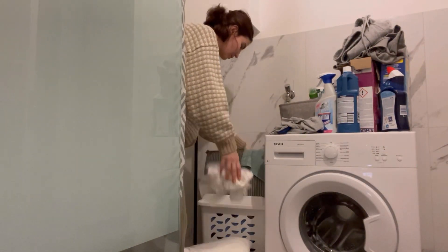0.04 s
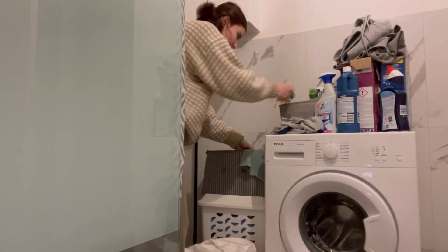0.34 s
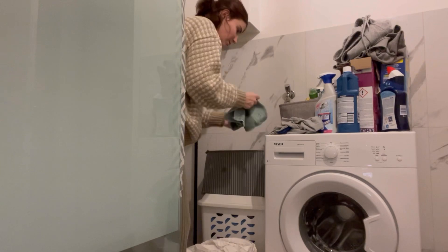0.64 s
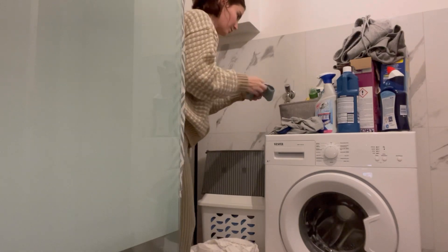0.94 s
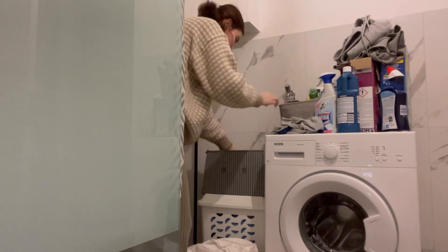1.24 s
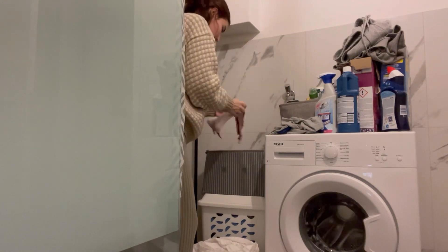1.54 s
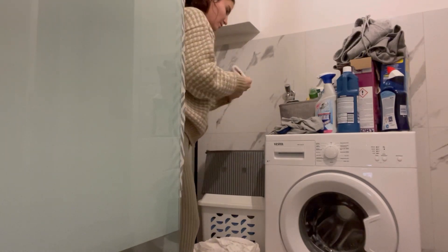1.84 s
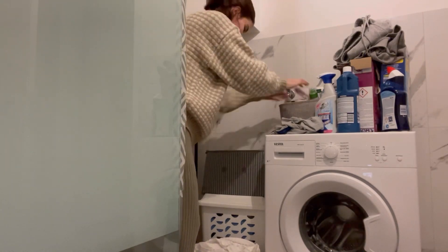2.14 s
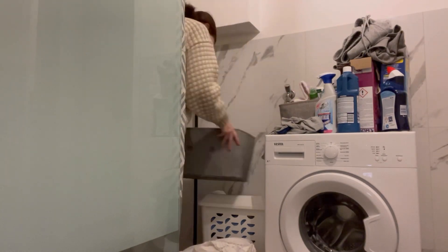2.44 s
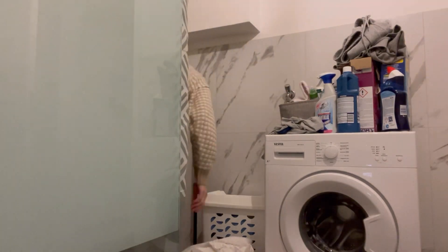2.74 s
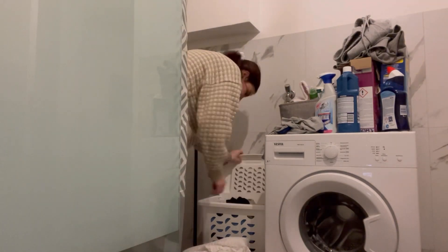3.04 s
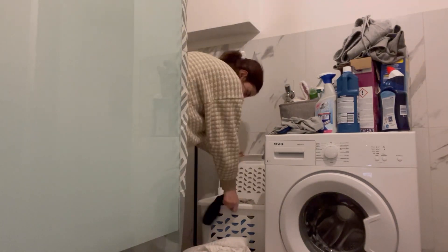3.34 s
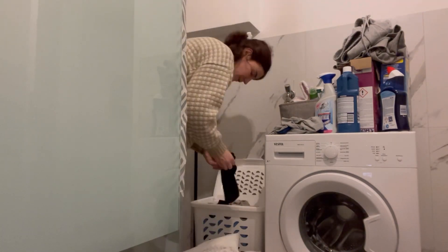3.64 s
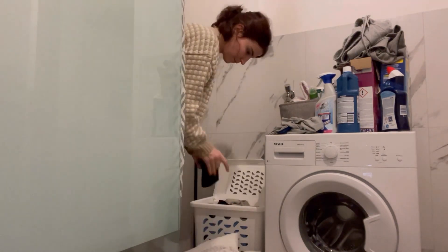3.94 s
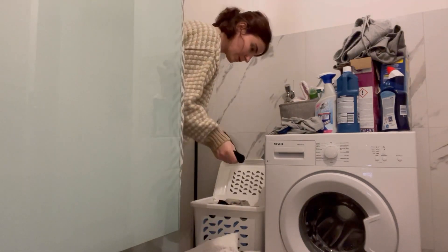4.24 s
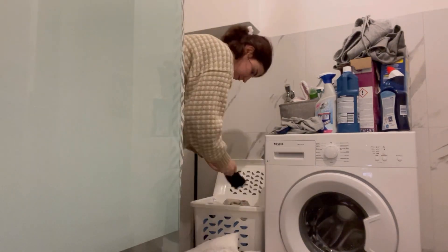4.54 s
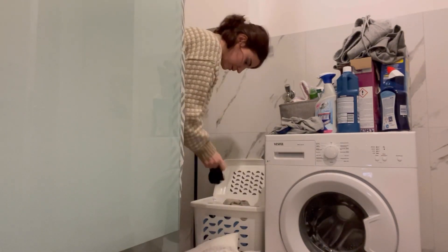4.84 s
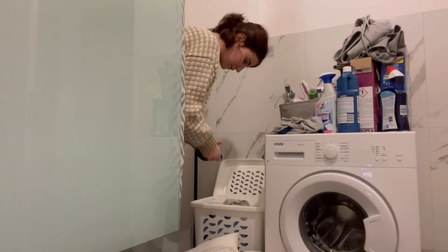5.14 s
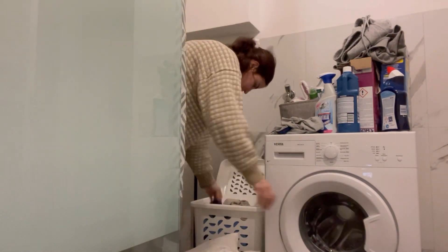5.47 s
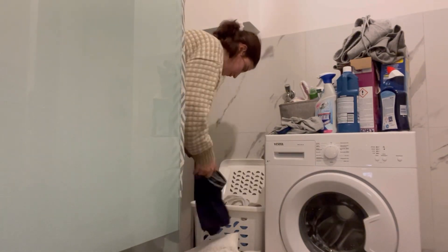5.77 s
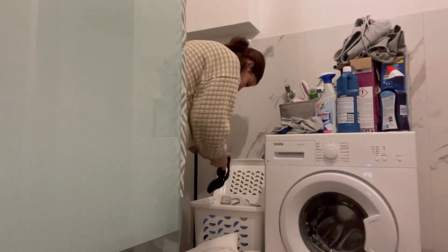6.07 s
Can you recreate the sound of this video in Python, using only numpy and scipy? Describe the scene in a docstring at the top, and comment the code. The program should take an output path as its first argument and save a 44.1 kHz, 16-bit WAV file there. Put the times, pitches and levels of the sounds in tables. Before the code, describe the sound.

Cloth rustles quietly in a tiled bathroom while small things are put down with light clinks. A hollow plastic basket is bumped and dragged, gives one sharp knock, and its lid snaps open with a bright crack and a few smaller clicks. Then socks are shaken in soft, dull flaps, followed by more rustling and faint bumps. Ventilation rushes low throughout, and a phone picks it all up from a couple of metres away.

```python
"""Sorting laundry in a tiled bathroom

The ventilation rushes quietly, and cloth rustles as its fibres catch and let go. Shaken socks
push puffs of air into the room. Small things are put down with a clink. A hollow plastic basket
is dragged and knocked, and its lid snaps open with a bright crack. The sounds bounce off the
tiles and reach a phone a couple of metres away."""
import sys
import numpy as np
from scipy import signal
from scipy.fft import rfft, irfft, next_fast_len
from scipy.io import wavfile
from scipy.ndimage import uniform_filter1d

SR = 44100
rng = np.random.default_rng(int(sys.argv[2]) if len(sys.argv) > 2 else 0)


def store_wav(level_fs):
    """Save 16-bit WAV to argv[1]."""
    pcm = np.round(np.clip(np.atleast_2d(level_fs), -1, 1) * 32767)
    wavfile.write(sys.argv[1], SR, pcm.T.astype(np.int16))


N = 273861
TIME = np.arange(N) / SR
RING_TIME = TIME[:SR // 2]  # half a second for one sound to ring out


def amp(db):
    """Turn decibels into a gain."""
    return 10 ** (np.asarray(db) / 20)


def unit(x):
    """Scale a sound to an average (rms) level of 1."""
    return x / np.sqrt(np.mean(x ** 2))


def short_rms(x):
    """Level of the loudest 25 ms."""
    return np.sqrt(uniform_filter1d(np.mean(x ** 2, axis=0), 1100).max())


def colour(x, points):
    """Shape the tone along (pitch_hz, gain_db) points."""
    n = 2 * next_fast_len(x.shape[-1] // 2 + SR // 20)
    hz, db = np.transpose(points)
    bin_hz = np.arange(n // 2 + 1) * SR / n
    gain = amp(np.interp(np.log(bin_hz + 1), np.log(hz), db))
    cepstrum = irfft(np.log(gain))
    cepstrum[1:n // 2] *= 2  # folded forward in time, so nothing rings before its cause
    cepstrum[n // 2 + 1:] = 0
    return irfft(rfft(x, n) * np.exp(rfft(cepstrum)))[..., :x.shape[-1]]


def butter(x, hz, kind, order=2):
    """Keep the lows, the highs or a band between."""
    return signal.sosfilt(signal.butter(order, hz, kind, fs=SR, output="sos"), x)


def fade(ring_s):
    """Die away by 60 dB in ring_s seconds."""
    return amp(-60 * RING_TIME / ring_s)


def swell(t, swell_s, fade_s):
    """One movement of the hand: it gathers until t = 0, then dies away."""
    return np.exp(-(t / np.where(t < 0, swell_s, fade_s)) ** 2)


def wander(per_s):
    """A smooth random drift, roughly between -1 and 1."""
    hold = int(SR / per_s)
    steps = np.repeat(rng.standard_normal(N // hold + 1), hold)
    return uniform_filter1d(steps, hold)[:N]


def clicks(per_s, scatter_db):
    """Tiny random clicks, most weak and a few strong."""
    signed = (rng.random((1, N)) < per_s / SR) * rng.choice([-1, 1], N)
    return signed * amp(scatter_db * np.minimum(rng.exponential(size=N), 4))


def add(out, start_s, sound):
    """Mix a sound in at start_s."""
    start = int(start_s * SR)
    sound = sound[:, max(-start, 0):out.shape[1] - start]
    out[:, max(start, 0):max(start, 0) + sound.shape[1]] += sound


# How wide the sound is between the two microphones: pitch_hz, side_minus_mid_db
STEREO_WIDTH = [(150, -32.5), (350, -11.5), (700, -2), (1400, -5), (2800, -1), (6000, 1.5)]
def diffuse(n):
    """Noise from all sides: alike left and right in the bass, unrelated in the treble."""
    mid, side = rng.standard_normal((2, n))
    side = colour(side, STEREO_WIDTH)
    return unit(np.array([mid + side, mid - side]))


def tiles(low_ring_s, high_ring_s, direct):
    """A direct click in both channels, then dense echoes; lows and treble each fade at their own rate."""
    noise = diffuse(len(RING_TIME))
    low = butter(noise, 1860, "low")
    out = low * fade(low_ring_s) + (noise - low) * fade(high_ring_s)
    out[:, 0] += direct
    return out


def ring(tones, build_s, lag_s, lead_s=0.00003, vary_db=4, build_cycles=0.38):
    """Tones build up between the walls, low ones last, and fade; each comes from its own direction."""
    out = 0
    for k, (hz, db, ring_s) in enumerate(tones):
        lag = (lead_s + lag_s * (2 * rng.random() - 1)) * np.array([[1], [-1]])
        size = amp(db + vary_db * rng.standard_normal())  # no two blows land on the same spot
        build = 1 - np.exp(-RING_TIME / (build_s + build_cycles / hz))
        tone = np.sin(2 * np.pi * hz * (RING_TIME + lag))
        out = out + (-1) ** k * size * build * fade(ring_s) * tone
    return unit(out)


def hollow(x, hz, width_hz, db):
    """The hollow nearest the contact swells after it and rings on."""
    return x + amp(db) * signal.lfilter(*signal.iirpeak(hz, hz / width_hz, fs=SR), x)


def tilt(hardness_db):
    """A harder contact lifts the top three of five pitch ranges by one, two and three steps."""
    return hardness_db * np.array([0, 0, 1, 2, 3])


# Borders of the five pitch ranges of a blow (thump, body, clack, edge, tick): pitch_hz
RANGE_EDGES = [150, 450, 1000, 2200, 6000, 15000]
def strike(body, range_db):
    """Where and how hard a blow lands decides how strongly each pitch range answers."""
    edges = np.transpose([RANGE_EDGES[:-1], RANGE_EDGES[1:]])
    centre_hz = np.sqrt(edges.prod(axis=1))
    for _ in range(2):
        levels = np.array([short_rms(butter(body, band, "band", order=4)) for band in edges])
        body = colour(body, np.transpose([centre_hz, range_db - 20 * np.log10(levels)]))
    return body


# Tone of the rushing air: pitch_hz, gain_db
AIR_COLOUR = [(18, -70), (30, -70), (70, -31), (115, -25), (165, -10), (215, -11.5), (280, -1), (449, -18),
              (721, -12.5), (822, -18.5), (1430, -20), (2010, -20.5), (2480, -16.5), (2900, -29.5),
              (3220, -18.5), (3870, -22.5), (12300, -40.5), (16000, -49)]
# Pitches at which the ventilation rings: pitch_hz, rough_width_hz, level_db
DUCT_TONES = [(184.4, 46, -71.5), (277.6, 24.7, -65.5), (346.6, 44, -72), (393, 23, -76.5),
              (716, 30, -74.5), (1458, 61, -74.5), (1738, 18, -80.5), (2431, 95, -71), (2537, 70, -72.5),
              (2754, 25, -74), (3170, 32, -75.5), (3110, 320, -75.5), (4935, 500, -77), (7010, 860, -77.5)]
def ventilation(rush_db=-64.5, waver_db=1.5):
    """A steady rush of air with narrow ringing bands, each wavering a little in level."""
    out = amp(rush_db) * unit(colour(diffuse(N), AIR_COLOUR))
    noise = diffuse(N)
    for hz, rough_width_hz, db in DUCT_TONES:
        b, a = signal.iirpeak(hz, hz / (1.16 * rough_width_hz), fs=SR)
        band = signal.lfilter(b, a, signal.lfilter(b, a, noise))
        out += amp(db) * unit(band * amp(waver_db * wander(per_s=6)))
    return out


# Tone of rubbing cloth: pitch_hz, gain_db
CLOTH_COLOUR = [(120, -6.5), (300, 12.5), (700, -8.5), (1500, -2.5), (3000, -1), (6000, -10.5),
                (10000, -11.5), (15000, -15)]
# Cloth pulled over cloth: peak_s, swell_s, fade_s, level_db
CLOTH_STROKES = [(.35, .02, .015, -72), (.436, 0.0094, 0.022, -62), (1.0, 0.048, .03, -80),
                 (1.21, 0.18, 0.036, -70.5), (1.334, 0.017, 0.023, -57.5), (1.7, 0.26, 0.35, -67.5),
                 (2.068, 0.016, 0.04, -65.5), (2.36, 0.069, 0.077, -61), (2.61, 0.017, 0.036, -57),
                 (2.685, 0.01, 0.066, -51), (2.895, 0.0073, 0.011, -57), (2.945, 0.014, 0.022, -73),
                 (3.73, 0.041, 0.12, -67.5), (4.0, .06, 0.054, -72.5), (4.065, 0.023, .025, -70),
                 (4.175, .025, .025, -66.5), (4.27, 0.05, 0.054, -67.5), (4.42, 0.0087, 0.016, -75),
                 (4.535, 0.018, 0.035, -63.5), (4.76, .04, 0.034, -81), (5.0, 0.15, 0.08, -69.5),
                 (5.3, 0.045, 0.049, -65.5), (5.318, 0.001, 0.011, -56), (5.54, 0.05, 0.027, -75),
                 (5.68, 0.033, 0.018, -66.5), (5.82, 0.074, 0.031, -72.5), (6.012, 0.0065, .025, -67)]
def rustle(fibres_per_s=800, creases_per_s=110, crease_db=-11, fidget_db=-77, sleeve_db=-12, folds=10):
    """Fibres catch and let go in dense tiny clicks; creases give way with crisper ones."""
    # The sleeves never rest, and they brush along with every scrape of the basket.
    sleeves = [(s, swell_s, fade_s, db + sleeve_db) for s, swell_s, fade_s, db, *_ in BASKET_SCRAPES]
    effort = amp(fidget_db)
    for peak_s, swell_s, fade_s, db in list(CLOTH_STROKES) + sleeves:
        effort = effort + amp(db) * swell(TIME - peak_s, swell_s, fade_s)
    fibres = creases = 0
    for _ in range(folds):  # each fold of cloth has its own echoes
        echoes = tiles(low_ring_s=0.2, high_ring_s=0.1, direct=5)
        catches = clicks(fibres_per_s / folds, scatter_db=1.5)
        fibres = fibres + signal.oaconvolve(catches, echoes, axes=1)[:, :N]
        buckles = clicks(creases_per_s / folds, scatter_db=4)
        creases = creases + signal.oaconvolve(buckles, echoes * fade(0.078), axes=1)[:, :N]
    crackle = unit(butter(colour(creases, CLOTH_COLOUR), 5440, "high"))
    cloth = unit(colour(fibres, CLOTH_COLOUR)) + amp(crease_db) * crackle
    flicker = amp(-0.8 * wander(per_s=41))
    return cloth * effort * flicker


# Low tones that ring between the tiled walls: pitch_hz, relative_db, ring_s
ROOM_TONES = [(190, -22, 0.12), (257.5, -0.5, 0.16), (282.8, -3.5, 0.16), (332.2, 0.5, 0.19),
              (386.6, -3, 0.089), (460, -4.5, 0.061), (572, -6.5, 0.059), (696, -16, 0.082)]
# Swings of a shaken sock: peak_s, length_s, relative_db, dull_above_hz
SOCK_SWINGS = [(3.661, 0.054, -51, 314), (3.767, 0.023, -50, 334), (3.821, 0.011, -42.5, 514),
               (3.9, 0.028, -46, 413), (3.988, 0.017, -46.5, 450), (4.053, 0.0051, -44.5, 520),
               (4.075, 0.019, -41, 305), (4.143, 0.0068, -40.5, 326), (4.229, 0.015, -37, 384),
               (4.316, 0.03, -45, 342), (4.38, 0.0019, -39.5, 395), (4.436, 0.043, -50, 281),
               (4.564, 0.016, -38, 300), (4.585, 0.0085, -45, 258), (4.663, 0.0064, -52.5, 296),
               (4.785, 0.018, -56.5, 290), (4.844, 0.012, -53, 298), (4.984, 0.021, -51, 315),
               (5.121, 0.021, -44.5, 288)]
def sock_flaps(push_db=-3, push_lead=0.357, walls_db=-9, gain_db=0.9):
    """Swinging cloth flutters, then goes taut with one push of air that wakes the room's low tones."""
    out = np.zeros((2, N))
    t = RING_TIME - RING_TIME.mean()
    for peak_s, length_s, db, dull_hz in SOCK_SWINGS:
        puff = rng.standard_normal(len(t)) * swell(t, length_s, length_s)
        puff /= np.linalg.norm(puff)
        puff[np.searchsorted(t, -push_lead * length_s)] += amp(push_db)  # just before the peak
        echoes = tiles(low_ring_s=0.43, high_ring_s=0.021, direct=7.5)
        walls = unit(colour(echoes, [(130, -3), (260, 8), (600, -1.5), (2000, -15)]))
        room = ring(ROOM_TONES, build_s=0.0012, lag_s=0.00008) + amp(walls_db) * walls
        sound = butter(signal.fftconvolve(puff[None], room), dull_hz, "low")
        sound = butter(sound, 205, "high", order=5)  # a small cloth cannot push deep bass
        add(out, peak_s + t[0], sound * amp(db) / short_rms(sound))
    return amp(gain_db) * out


# The close tones of one small hollow thing: pitch_ratio, relative_db
CLINK_TONES = [(.91, 8), (.955, 9), (1.001, 2.5), (1.081, 8.5), (1.13, -7)]
# Small hollow things being bumped: start_s, pitch_hz, level_db, ring_s
CLINK_HITS = [(1.051, 1318, -39.5, 0.14), (1.157, 2110, -50, 0.031), (1.162, 1406, -43.5, 0.046),
              (1.283, 2320, -48.5, 0.081), (2.49, 2168, -36.5, 0.055), (2.49, 4950, -49, 0.022),
              (2.728, 1255, -30, 0.033), (3.431, 4100, -47, 0.044), (3.432, 2894, -43.5, 0.096),
              (6.011, 1380, -60, 0.048)]
def clinks():
    """A small hollow thing rings with close tones that beat against each other and die quickly."""
    out = np.zeros((2, N))
    for start_s, hz, db, ring_s in CLINK_HITS:
        tones = [(ratio * hz, tone_db, ring_s) for ratio, tone_db in CLINK_TONES]
        sound = ring(tones, build_s=0.00066, lag_s=0.00008)
        add(out, start_s, sound * amp(db) / short_rms(sound))
    return out


# Tones of the basket and the air around it, scraped or knocked: pitch_hz, relative_db, ring_s
BASKET_TONES = [(184.5, -5.5, 0.177), (282.4, -1, 0.18), (342.9, 1, 0.25), (384, 2, 0.095),
                (481, -6.5, 0.2), (556, -1.5, 0.12), (577.8, 6, 0.12), (676, -2, 0.17), (807, 7.5, 0.12),
                (929, 0.5, 0.17), (997, -6.5, 0.19), (1173, -2, 0.14), (1298, 4, 0.11), (1450, -4.5, 0.12),
                (1650, -13, 0.082), (1800, -13, 0.046), (2017, -10.5, 0.14), (2390, -18, 0.3),
                (2410, -18, 0.11), (2980, -3, 0.079)]
# Tone of the crack when something touches the basket: pitch_hz, gain_db
CRACK_COLOUR = [(60, 0), (120, -7), (400, 6), (900, 3), (1500, 0.5), (3000, -7.5), (6000, -25),
                (15000, -39.5)]
# Plastic and sleeves dragged over plastic:
# peak_s, swell_s, fade_s, level_db, thin_below_hz, dull_above_hz, hollow_hz
BASKET_SCRAPES = [(0.112, 0.014, 0.024, -59.5, 263, 2800, 356), (2.065, 0.028, 0.028, -55, 302, 1130, 530),
                  (2.389, 0.018, 0.0092, -48, 258, 590, 354), (2.675, 0.011, 0.035, -47, 240, 1200, 469),
                  (2.924, 0.034, 0.037, -46, 292, 517, 332), (3.412, 0.027, 0.026, -38.5, 450, 800, 551),
                  (3.439, 0.015, 0.017, -39.5, 320, 467, 381), (5.549, 0.057, 0.067, -57.5, 230, 540, 334),
                  (6.014, 0.03, 0.012, -61, 228, 1400, 1320)]
def basket_scrapes(slips_per_s=700, scatter_db=-2.5, walls_db=-1):
    """Dragged plastic sticks and slips in uneven little jerks that shake the basket."""
    out = np.zeros((2, N))
    t = RING_TIME - RING_TIME.mean()
    for peak_s, swell_s, fade_s, db, thin_hz, dull_hz, hollow_hz in BASKET_SCRAPES:
        slips = (rng.random(len(t)) < slips_per_s / SR) * amp(scatter_db * rng.standard_normal(len(t)))
        force = slips * swell(t, swell_s, fade_s)
        body = ring(BASKET_TONES, build_s=0.00059, lag_s=0.00009) * fade(0.32)  # rubbing damps the ring
        walls = unit(colour(tiles(low_ring_s=0.008, high_ring_s=0.14, direct=0.45), CRACK_COLOUR))
        sound = signal.fftconvolve(force[None], body + amp(walls_db) * walls)
        sound = butter(sound, dull_hz, "low", order=3)
        sound = butter(sound, thin_hz, "high", order=4)
        sound = hollow(sound, hollow_hz, width_hz=35, db=10)
        add(out, peak_s + t[0], sound * amp(db) / (short_rms(sound) + 1e-12))
    return out


# Tones of the plastic lid: pitch_hz, relative_db, ring_s
LID_TONES = [(278.3, 1.5, 0.39), (344.3, 7, 0.16), (401.6, 5.5, 0.23), (563, 1.5, 0.16), (650, 2, 0.11),
             (816, 11.5, 0.12), (1047, 11, 0.13), (1448, 20, 0.069), (1486, 13.5, 0.13),
             (2853, 21.5, 0.085), (2940, 36, 0.06), (3340, 19, 0.15), (4040, 31, 0.094), (4200, 13, 0.089),
             (4370, 14, 0.1), (4560, 15, 0.057), (4700, 32, 0.07), (4830, 22, 0.13), (5060, 26.5, .14),
             (5400, 27, 0.11), (5600, 17, 0.071), (7640, 22, 0.1), (9000, 14, .08)]
# Tone of the lid's crack: pitch_hz, gain_db
SNAP_COLOUR = [(150, -20.5), (800, -20), (1400, -14.5), (2000, -16.5), (2900, -2), (3500, -10), (4200, 1.5),
               (5200, 3.5), (6200, -4.5), (9500, -1.5), (15000, -14.5)]
# Snaps of the hinge and catch: start_s, relative_db, hardness_db
LID_SNAPS = [(3.0334, -40.5, 1.24), (3.3011, -48, 0.75), (3.431, -47.5, -3.5), (3.539, -53, -4)]
def lid_snaps(crack_db=8, tick_db=1.5, range_db=(1.5, -0.5, 1.5, 14, 8), gain_db=-2):
    """The lid lets go all at once with a bright crack, then its panel hums briefly."""
    out = np.zeros((2, N))
    for start_s, db, hardness_db in LID_SNAPS:
        crack = tiles(low_ring_s=0.21, high_ring_s=0.13, direct=1.8)
        crack *= 1 + 0.59 * fade(0.27)  # strongest off the nearest walls
        body = ring(LID_TONES, build_s=0.0064, lag_s=0.00007)
        body += amp(crack_db) * unit(colour(crack, SNAP_COLOUR))
        catch_tick = unit(butter(diffuse(len(RING_TIME)) * fade(0.011), [4000, 5700], "band"))
        body = butter(body + amp(tick_db) * catch_tick, 270, "high", order=4)  # a light lid has no bass
        body = hollow(body, hz=343, width_hz=20, db=4)  # the panel's hum
        add(out, start_s, amp(db) * strike(body, range_db + tilt(hardness_db)))
    return amp(gain_db) * out


# Things put down and bumps of the basket:
# start_s, relative_db, extra_thump_db, hardness_db, hollow_hz, hollow_db
BASKET_KNOCKS = [(0.092, -60.5, 6, 4, 345, 5), (1.047, -50.5, -4, 1, 550, -11),
                 (1.156, -40.5, -8, -2.5, 538, 9), (1.257, -51.5, 9.5, -3, 366, 14.5),
                 (1.282, -57, 5.5, 2, 358, 11), (1.368, -49, -4, -7.5, 343, 3),
                 (2.228, -53.5, 3.5, -6.5, 328, 6), (2.25, -56.5, -9, -14, 397, 8),
                 (2.49, -38.5, 1.5, 2, 370, -27), (2.607, -44, -1, -6, 324, -10),
                 (2.662, -47, -6, -7, 680, -7), (2.722, -23, -12, -2.5, 683, 4),
                 (2.743, -34.5, -7, -11, 780, 1), (2.836, -58.5, 8, 3, 335, 2),
                 (2.895, -43, -9.5, -10.5, 563, 16), (3.186, -45.5, -7, -10.5, 546, -27),
                 (3.412, -46.5, -16, -7, 566, 1), (4.133, -57.5, -9.5, -11, 560, 4),
                 (4.418, -57.5, 0, 0, 1230, -5), (4.497, -58.5, -7, -4, 680, 7),
                 (5.283, -64.5, 4, -8, 494, 3), (5.486, -57, 0, -16, 564, 1),
                 (5.565, -57.5, -4.5, -10, 570, 6), (5.62, -50, -1.5, -19, 338, 9),
                 (6.003, -58, 7, 0.5, 1270, -3)]
def basket_knocks(crack_db=-1, settle_s=0.00051, bounce_s=0.0044, thud_db=-25, gain_db=-2):
    """Light plastic lands, touches again and rings in the room; the floor answers with a faint thud."""
    out = np.zeros((2, N))
    for start_s, db, extra_thump_db, hardness_db, hollow_hz, hollow_db in BASKET_KNOCKS:
        crack = tiles(low_ring_s=0.15, high_ring_s=0.13, direct=3) * (1 - np.exp(-RING_TIME / settle_s))
        add(crack, bounce_s, 0.42 * tiles(low_ring_s=0.07, high_ring_s=0.038, direct=5))
        body = ring(BASKET_TONES, build_s=0.0065, lag_s=0.00007)
        body += amp(crack_db) * unit(colour(crack, CRACK_COLOUR))
        body = hollow(body, hollow_hz, width_hz=40, db=hollow_db)
        range_db = [3.5 + extra_thump_db, 0, 1, -4.5, -15.5] + tilt(hardness_db)
        knock = strike(butter(body, 155, "high", order=3), range_db)
        thud = butter(diffuse(len(RING_TIME)) * fade(0.12), 70, "low")
        add(out, start_s, amp(db) * (knock + amp(thud_db) * thud / short_rms(thud)))
    return amp(gain_db) * out


def scene():
    """The basket, the small things and the cloth, over the ventilation."""
    handling = basket_knocks() + clinks() + lid_snaps() + basket_scrapes() + sock_flaps()
    return handling + rustle() + ventilation()


# How the phone's two microphones differ in tone: pitch_hz, left_minus_right_db
MIC_BALANCE = [(180, 1.5), (320, 4), (700, 4), (1300, 0), (2500, -2), (5000, -0.5), (12000, 0)]
def record(dry, bass_hz=118, top_hz=15900):
    """The phone colours left and right a little differently, thins the bass and cuts the top."""
    left = colour(dry[0], [(hz, db / 2) for hz, db in MIC_BALANCE])
    right = colour(dry[1], [(hz, -db / 2) for hz, db in MIC_BALANCE])
    thinned = butter(np.array([left, right]), bass_hz, "high")
    return signal.sosfilt(signal.ellip(8, 0.2, 70, top_hz, fs=SR, output="sos"), thinned)


dry = scene()
out = record(dry)
store_wav(out)
```